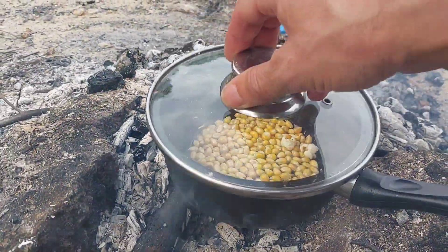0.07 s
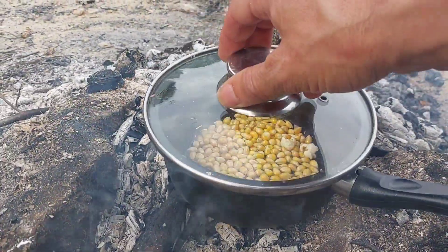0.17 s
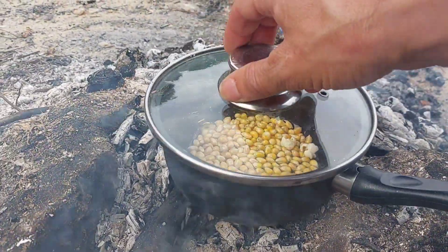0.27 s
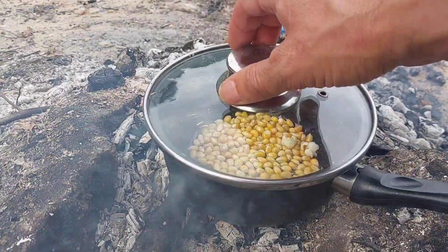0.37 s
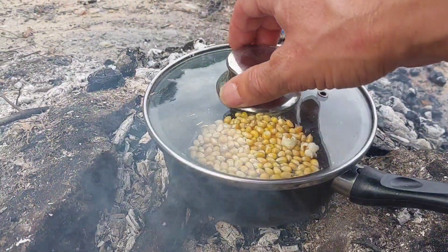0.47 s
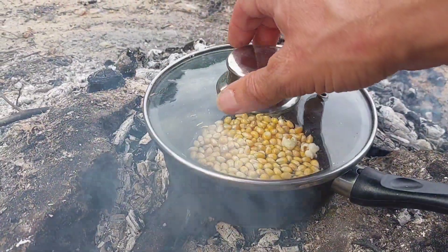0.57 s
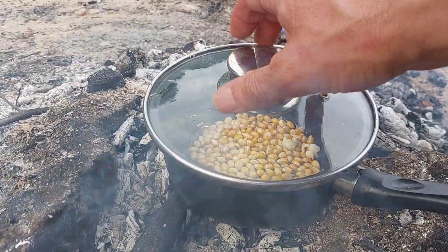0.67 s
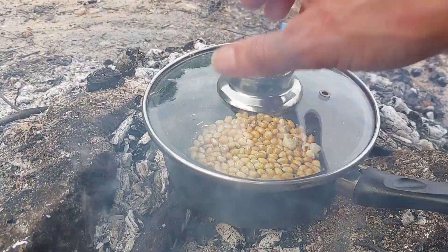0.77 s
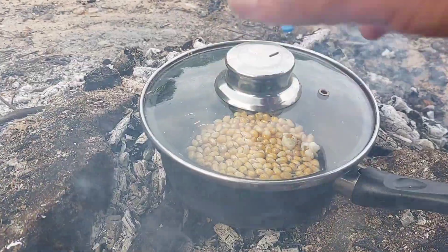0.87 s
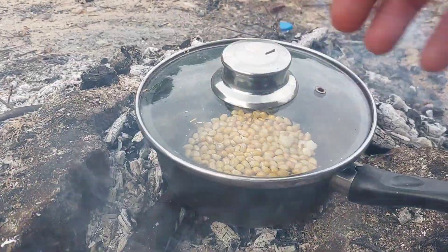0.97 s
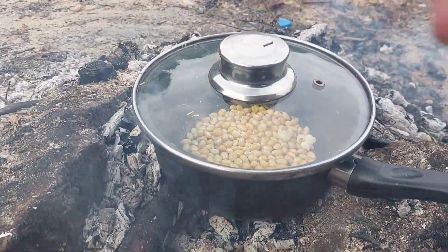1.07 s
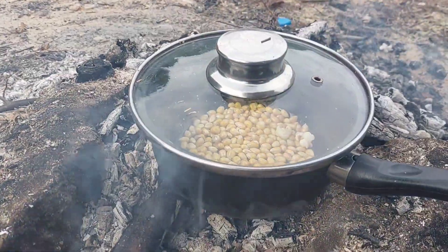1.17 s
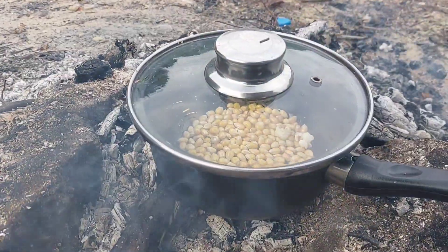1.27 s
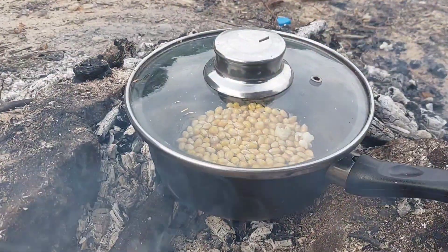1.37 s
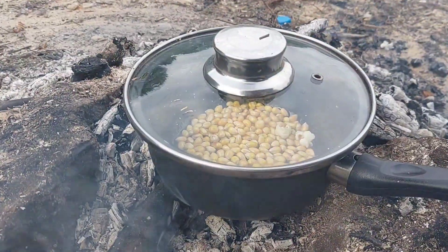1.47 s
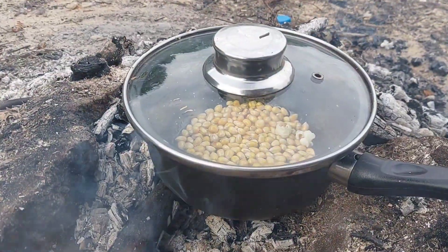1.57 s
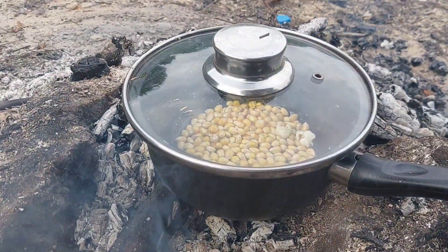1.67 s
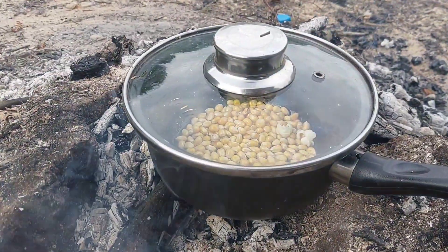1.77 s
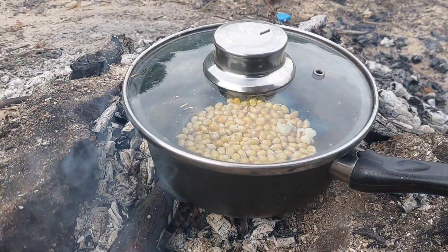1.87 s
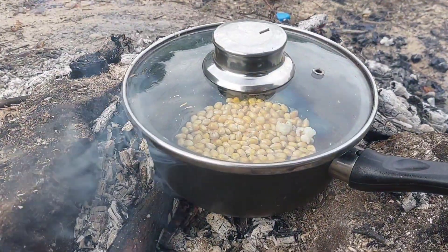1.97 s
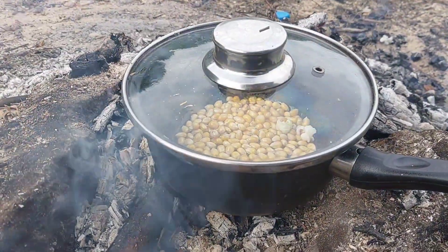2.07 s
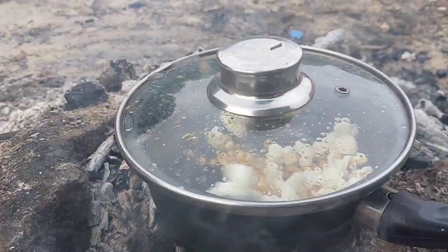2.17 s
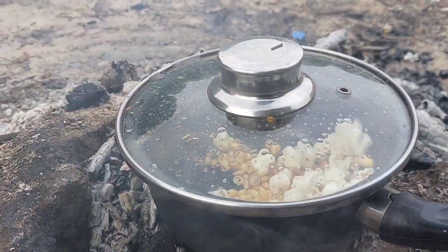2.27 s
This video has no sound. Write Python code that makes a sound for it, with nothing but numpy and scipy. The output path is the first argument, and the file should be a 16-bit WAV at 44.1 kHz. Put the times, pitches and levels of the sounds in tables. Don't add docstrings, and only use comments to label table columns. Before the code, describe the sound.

Close stereo microphone outdoors: faint sizzle and ember ticks, then a short hard rattle of a lid seating on a pot, followed by quiet low gusts, a tiny oil spit and a faint kernel tap.

```python
import sys
import numpy as np
from scipy import signal
from scipy.fft import rfft, irfft
from scipy.io import wavfile
from scipy.ndimage import uniform_filter1d

SR = 44100
rng = np.random.default_rng(int(sys.argv[2]) if len(sys.argv) > 2 else 0)


def voltage_ratio(level):
    return 10 ** (np.asarray(level, float) / 20)


def master(y):
    cut = np.clip(np.atleast_2d(y).T, -1, 1)
    pcm = np.round(cut * 32767)
    wavfile.write(sys.argv[1], SR, pcm.astype(np.int16))


N = 101430
LEFT_RIGHT = np.array([[1], [-1]])


def curve(table):
    return voltage_ratio(np.interp(np.arange(N) / SR, *np.array(table).T))


def unit(x):
    return x / np.sqrt(np.mean(x ** 2))


def fade(t, t60):
    return np.exp(-np.log(1000) * t / t60)


def resonate(x, hz, width_hz):
    b, a = signal.iirpeak(min(hz, .45 * SR), max(hz / width_hz, .3), SR)
    return signal.lfilter(b, a, signal.lfilter(b, a, x))


def walk(rate):
    hold = int(SR / rate)
    steps = np.repeat(rng.standard_normal(N // hold + 1), hold)
    return 1.7 * uniform_filter1d(uniform_filter1d(steps, hold), hold)[:N]


def colour(table, size):
    hz = np.fft.rfftfreq(size, 1 / SR) + 1
    f, db = np.array(table).T
    inside = np.interp(np.log(hz), np.log(f), db)
    below = 24 * np.maximum(np.log2(f[0] / hz), 0)
    above = 24 * np.maximum(np.log2(hz / f[-1]), 0)
    noise = rng.standard_normal((2, size))
    return unit(irfft(rfft(noise) * voltage_ratio(inside - below - above), size))


def spread(pair, side_db):
    mid, side = pair[0], voltage_ratio(side_db) * pair[1]
    return np.array([mid + side, mid - side])


def add(out, x, start_s):
    i = int(start_s * SR)
    out[:, i:i + x.shape[1]] += x[:, :N - i]


def lid():
    # t/s, thud f/Hz, thud level/dB, thud t60/s, ring level/dB
    contacts = [(.2317, 594, -12.5, 0.03, -20), (.2421, 603.6, -16, 0.057, -24.5),
                (.2468, 600, -28, .04, -29.5), (.2527, 600.4, -25, 0.065, -31),
                (0.2948, 500.5, -21.5, .04, -34), (0.2983, 965, -15.5, .024, -28.5),
                (0.3001, 982.6, -14, .015, -15), (.3030, 540, -28.5, .03, -24),
                (.3060, 330.5, -18.5, .045, -37.5), (0.3294, 474, -14, 0.014, -28),
                (0.3341, 240, -31.5, 0.079, -31.5), (.3385, 299.6, -37, .05, -41.5)]
    # f/Hz, level/dB, t60/s
    modes = [(1224, -3, 0.016), (1842, -20, 0.088), (2125, 4, 0.018), (2277, -13.5, .03),
             (3444, -13, 0.027), (4100, -12.5, 0.023), (5300, -12.5, 0.03), (6200, -22, .025),
             (6457, -16.5, 0.01), (7560, -15.5, 0.023), (10507, -19, .018), (11200, -14, .025),
             (12000, -19, 0.024), (14000, -23.5, 0.018)]
    # f/Hz, density/dB per Hz
    rattle = [(900, -0.5), (2300, -7), (3200, -10), (4800, -16.5), (7000, -2), (9000, -14.5), (11500, -6.5),
              (15500, -15)]
    # f/Hz, density/dB per Hz
    tail = [(350, 4.5), (1200, 1), (2200, 1), (4200, -5), (5500, -23), (15500, -19)]
    rattle_db, rattle_t60_s, tail_db, tail_t60_s = -6.5, .021, -31, .17
    knock_left_db, rattle_left_db = 3, -3
    thud_lag_rad, touch_s = 0.16, 0.00048

    out, t = np.zeros((2, N)), np.arange(8192) / SR
    for start, hz, thud_db, thud_t60, ring_db in contacts:
        knock = -voltage_ratio(thud_db) * np.sin(2 * np.pi * hz * t + LEFT_RIGHT * thud_lag_rad) * fade(t, thud_t60)
        for f, db, ring_t60 in modes:
            level_luck, pitch_luck, phase_luck, beat_luck = rng.standard_normal(4)
            beat = 1 + .5 * np.sin(2 * np.pi * 0.033 * f * t + 2 * beat_luck)
            phase = LEFT_RIGHT * min(f / 2800, 1) * 0.63 + phase_luck * min(f / 8000, 1)
            ring = np.sin(2 * np.pi * f * (1 + .01 * pitch_luck) * t + phase)
            knock = knock - voltage_ratio(ring_db + db + 2.0 * level_luck) * beat * ring * fade(t, ring_t60)
        pot = spread(colour(tail, size=len(t)), -4.5)
        knock = knock + voltage_ratio(ring_db + tail_db) * fade(t, tail_t60_s) * pot
        grit = voltage_ratio(1.5 * np.repeat(rng.standard_normal(len(t) // 32), 32))
        scrape = spread(colour(rattle, size=len(t)), 0) * grit * fade(t, rattle_t60_s)
        knock = knock * voltage_ratio(LEFT_RIGHT * knock_left_db / 2)
        scrape = scrape * voltage_ratio(ring_db + rattle_db + LEFT_RIGHT * rattle_left_db / 2)
        add(out, (knock + scrape) * np.minimum(t / touch_s, 1), start)
    return out


def kernel():
    # f/Hz, level/dB, t60/s
    wall = [(484, -46, 0.035), (1483, -52, 0.019), (992, -55, 0.026), (1910, -57, .015), (2900, -62, .01)]
    out, t = np.zeros((2, N)), np.arange(4096) / SR
    ping = sum(voltage_ratio(db) * np.sin(2 * np.pi * hz * t) * fade(t, t60) for hz, db, t60 in wall)
    add(out, ping * np.ones((2, 1)), 2.1207)
    return out


def ticks():
    # t/s, level/dB, f/Hz, width/Hz, t60/s
    bursts = [(.074, -58, 4800, 1000, .03), (.062, -53, 8400, 2000, .03), (.112, -64, 4400, 1500, 0.032),
              (.39, -56.5, 397, 300, 0.59), (.385, -67, 9300, 9000, .02), (.945, -69, 6500, 3000, .03),
              (1.476, -66.5, 7200, 2500, .03), (1.62, -74, 7800, 1700, .03),
              (1.685, -68, 12700, 2300, 0.031), (1.686, -68.5, 6000, 7400, .03),
              (1.7465, -53.5, 4700, 3900, .015), (2.124, -64, 6500, 7800, 0.054),
              (2.035, -65, 8000, 8300, 0.025), (2.11, -67.5, 5000, 15000, 0.39),
              (2.142, -63, 3700, 4200, 0.045)]
    out, t = np.zeros((2, N)), np.arange(4096) / SR
    for start, db, hz, width_hz, t60 in bursts:
        crack = spread(rng.standard_normal((2, len(t))), 20 * np.log10(.5))
        add(out, voltage_ratio(db) * unit(resonate(crack, hz, width_hz)) * fade(t, t60), start)
    return out


def sizzle():
    # t/s, level/dB
    hiss_db = [(0, -61.5), (.06, -60), (.12, -63.5), (.3, -67), (.6, -76.5), (1.1, -79), (1.6, -73.5),
               (1.9, -74), (2.16, -72)]
    # f/Hz, density/dB per Hz
    hiss_colour = [(1300, -9), (2800, -8.5), (5300, -5), (6600, -1), (9000, -3.5), (12200, 3),
                   (16000, -2.5)]
    # t/s, level/dB
    spit_db = [
        (1.66, -87),
        (1.705, -68.5),
        (1.745, -62.5),
        (1.77, -68.5),
        (1.81, -84.5),
    ]
    # f/Hz, width/Hz, level/dB
    spit_bands = [(4600, 5000, -5), (12970, 15000, 0)]

    hiss = spread(colour(hiss_colour, size=N), 0.5)
    low = signal.lfilter(*signal.butter(2, 6000., fs=SR), hiss)
    flicker = low * voltage_ratio(.9 * walk(30)) + (hiss - low) * voltage_ratio(.9 * walk(30))
    droplets = spread(rng.standard_normal((2, N)), 0.5) * voltage_ratio(2.0 * rng.exponential(size=N))
    spit = sum(voltage_ratio(db) * unit(resonate(droplets, hz, width_hz)) for hz, width_hz, db in spit_bands)
    return curve(hiss_db) * flicker + curve(spit_db) * voltage_ratio(2.3 * walk(60)) * spit


def wind():
    # f/Hz, density/dB per Hz
    wind_colour = [(32, -24.5), (52, -0.5), (146, -2), (260, -12.5), (390, -28), (600, -28.5), (1000, -34),
                   (1300, -47)]
    # t/s, level/dB
    gust_db = [(0, -45.5), (.3, -50), (.46, -48), (.6, -50.5), (.64, -45.5), (.7, -50.5), (1.04, -53),
               (1.17, -46), (1.4, -51.5), (1.51, -40.5), (1.56, -47.5), (1.66, -43.5), (1.78, -52),
               (2.0, -51), (2.16, -52)]
    # upper edge f/Hz, swing/dB, rate/per s, side level/dB, share of gust [power]
    gust_bands = [
        (91, 1.5, 10, -6, 1),
        (202.4, 0, 15, -18, 0.48),
        (400, 2.0, 8.83, -8, 0.24),
        (1508, .8, 20, -3.5, .05),
    ]
    # t/s, level/dB
    draught_db = [(0, 4), (.2, 4), (.5, 0), (1.5, -1), (1.7, 3), (1.9, 1), (2.16, 0)]
    mean_db, left_db = -49.5, 1

    air = colour(wind_colour, size=N)
    gust = curve(gust_db) / voltage_ratio(mean_db)
    out, below = np.zeros((2, N)), 0
    for edge_hz, swing_db, rate, side_db, share in gust_bands:
        upto = signal.sosfiltfilt(signal.butter(2, edge_hz, fs=SR, output="sos"), air)
        layer = spread(upto - below, side_db) * voltage_ratio(swing_db * walk(rate)) * gust ** share
        if edge_hz > 1000:
            layer = layer * curve(draught_db)
        out, below = out + layer, upto
    return voltage_ratio(mean_db + LEFT_RIGHT * left_db / 2) * out


def whistles():
    # t/s, length/s, from f/Hz, to f/Hz, level/dB
    glides = [
        (0.023, 0.128, 266, 470, -62),
        (0.14, 0.028, 587, 710, -71),
        (1.2, 0.073, 247.4, 269, -53.5),
    ]
    out, waver = np.zeros((2, N)), walk(70)
    for start, length, from_hz, to_hz, db in glides:
        u = np.linspace(0, 1, int(length * SR))
        w = waver[int(start * SR):][:len(u)]
        hz = (from_hz + (to_hz - from_hz) * u) * (1 + .03 * w)
        tone = np.sin(2 * np.pi * np.cumsum(hz) / SR)
        add(out, voltage_ratio(db + 3.0 * w) * np.sin(np.pi * u) * tone * np.array([[1.1], [.9]]), start)
    return out


def hush():
    # f/Hz, density/dB per Hz
    distance = [(1300, 0), (2200, -2.5), (3500, -10)]
    return voltage_ratio(-87) * spread(colour(distance, size=N), -2)


def scene():
    return lid() + kernel() + ticks() + sizzle() + wind() + whistles() + hush()


def band_limit(x):
    return signal.sosfilt(signal.butter(12, 16620, fs=SR, output="sos"), x)


def record(dry):
    top_hz, end_s = 15720, 2.1672
    heard = signal.sosfilt(signal.ellip(8, .2, 60, top_hz, fs=SR, output="sos"), dry)
    mix = heard * (np.arange(N) < end_s * SR)
    return band_limit(mix)


dry = scene()
out = record(dry)
master(out)
```